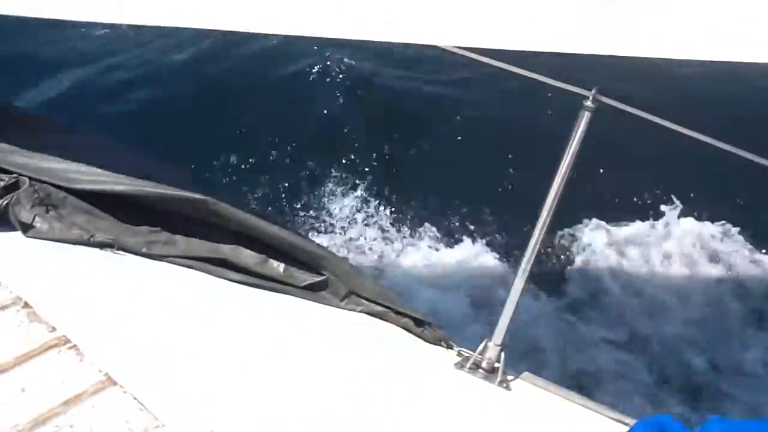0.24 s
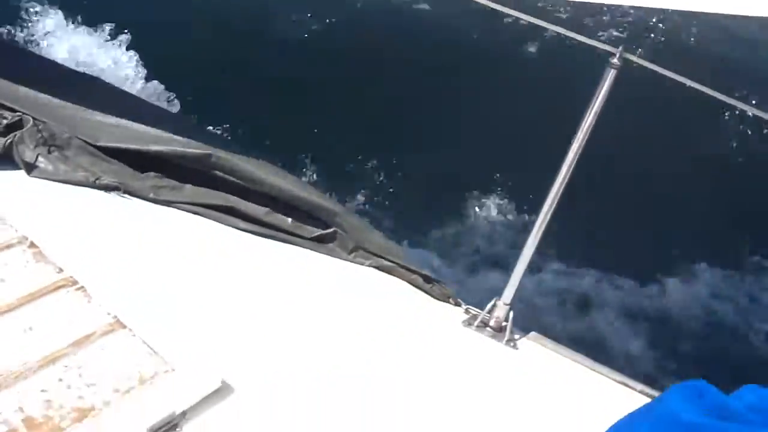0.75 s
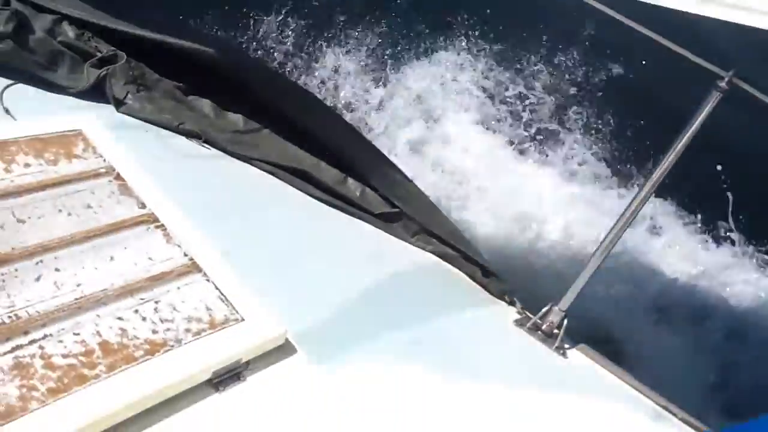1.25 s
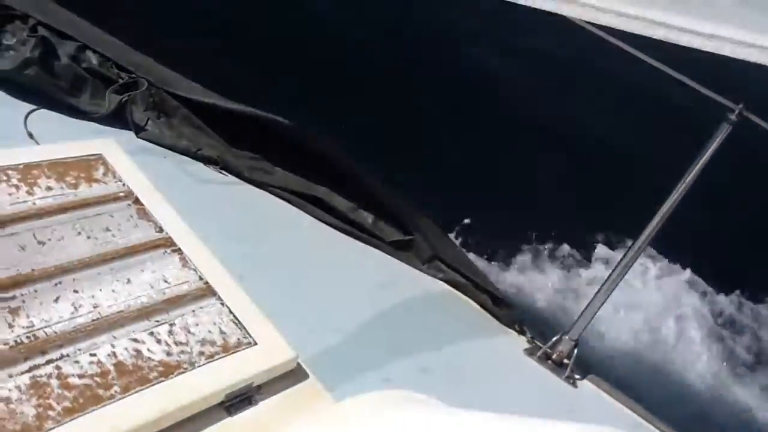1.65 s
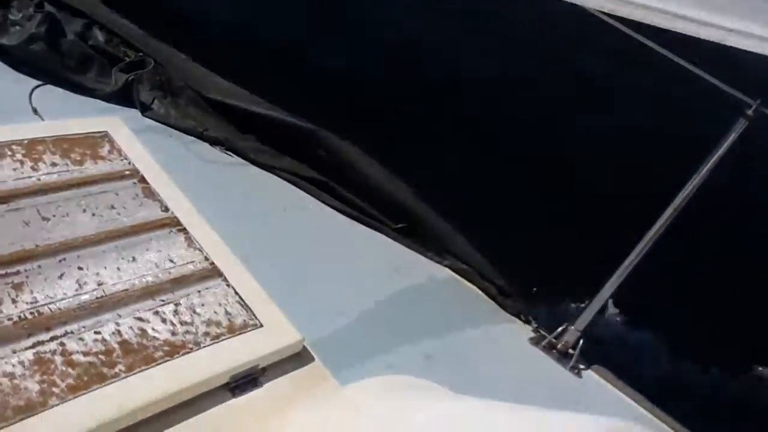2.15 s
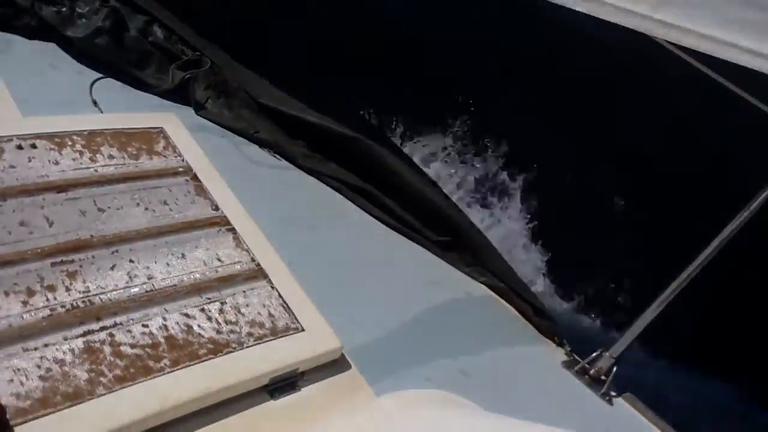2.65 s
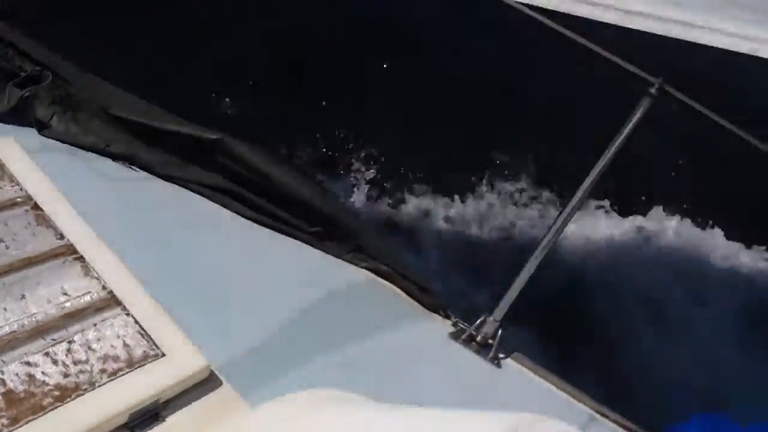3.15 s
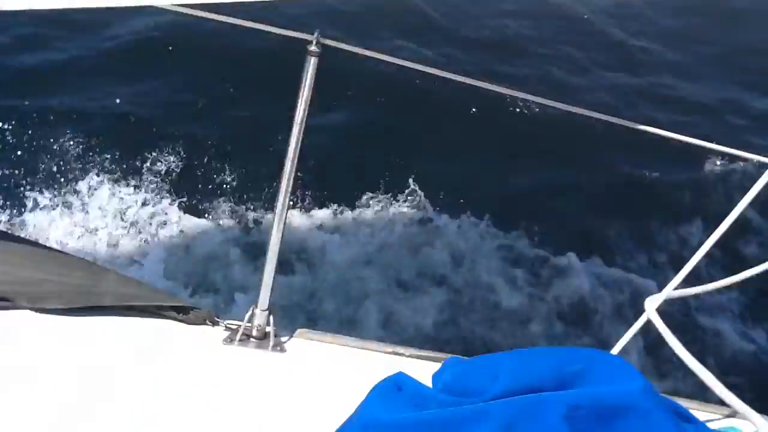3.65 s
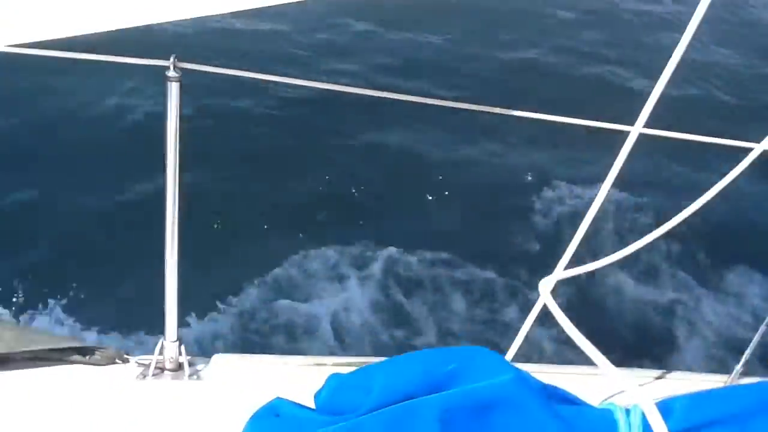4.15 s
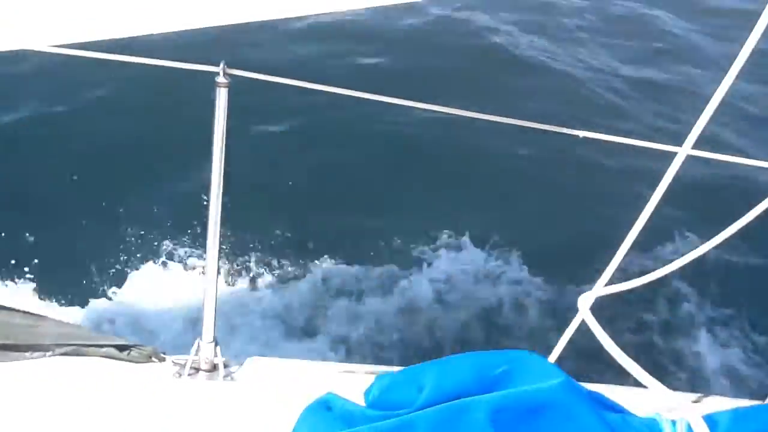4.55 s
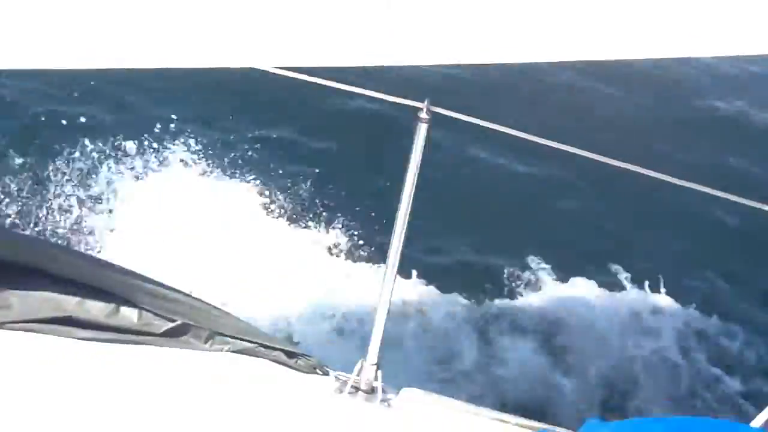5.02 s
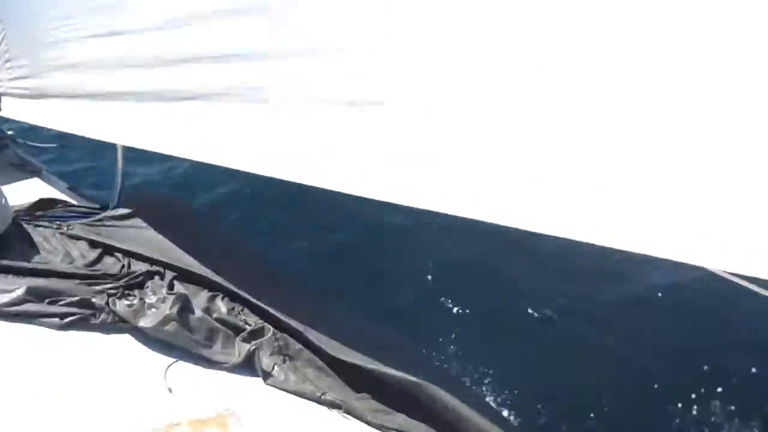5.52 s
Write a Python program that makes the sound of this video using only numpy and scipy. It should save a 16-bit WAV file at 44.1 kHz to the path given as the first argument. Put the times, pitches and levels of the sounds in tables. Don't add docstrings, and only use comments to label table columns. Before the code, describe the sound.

Wind buffets and crackles over a bare microphone on a sailing boat while spray hisses and foam washes along the hull.

```python
import sys
import numpy as np
from scipy import signal
from scipy.io import wavfile
from scipy.ndimage import uniform_filter1d

SR = 44100
rng = np.random.default_rng(int(sys.argv[2]) if len(sys.argv) > 2 else 0)


def materialize(psi):
    bounded = np.clip(np.atleast_2d(psi).T, -1, 1)
    quanta = np.round(bounded * 32767).astype(np.int16)
    wavfile.write(sys.argv[1], SR, quanta)


def volts(x):
    e = np.asarray(x, float) / 20
    return 10 ** e


N = 254898

# time_s, rumble_db, turbulence_db
WIND_LEVELS = [(0.0, -27, 3), (0.66, -28, -3), (1.22, -26.5, 2.5), (1.45, -30, 2), (1.69, -26, -1.5),
               (1.82, -25, 0), (2.09, -22, -1.5), (2.4, -29.5, -1.5), (2.88, -25.5, -1.5),
               (3.32, -25.5, -0.5), (3.73, -19.5, -2.5), (3.91, -26, 1), (4.3, -27.5, -11), (4.51, -30, 0),
               (4.8, -27, -2.5), (5.25, -27, 0), (5.65, -32, -8), (5.78, -32, 0)]
# centre_s, change_db, length_ms
AIR_PUFFS = [(.67, -5, 66), (.80, 4, 60), (1.13, 0, 60), (1.40, 5, 98), (1.51, -2, 140), (1.70, 3.5, 66),
             (1.824, -8, 36), (2.08, 0.5, 80), (2.335, -7, 30), (2.47, -2, 62), (2.62, 5.5, 82),
             (2.98, 5.5, 110), (3.15, -5.5, 92), (3.315, -5.5, 53), (3.69, 0, 45), (4.00, 3, 60),
             (4.07, 5, 44), (4.20, -3, 41), (4.38, 3, 37), (4.44, -3.5, 140), (4.83, 3, 45),
             (4.885, -12, 25), (5.02, 2.5, 46), (5.22, -7, 52), (5.33, 2, 88), (5.46, -3.5, 52),
             (5.54, 7.5, 51), (5.68, 3, 71)]
# peak_s, peak_db, rise_db_per_s, fall_db_per_s
BOW_SURGES = [(0.0, -48, 40, 45), (.35, -43.5, 35, 40), (1.07, -36, 50, 38), (1.17, -36, 40, 40),
              (1.26, -33.5, 40, 60), (1.31, -39, 60, 60), (1.52, -46, 30, 30), (1.7, -46.5, 25, 100),
              (2.1, -52.5, 40, 30), (2.48, -54, 90, 20), (2.64, -40.5, 48, 47), (2.95, -34, 44, 54),
              (3.33, -36.5, 69, 37), (3.59, -36, 51, 75), (3.73, -40, 64, 62), (3.88, -51, 40, 73),
              (4.4, -49, 30, 20), (4.59, -46, 22, 30), (4.97, -46, 60, 40), (5.07, -37, 60, 60),
              (5.14, -32.5, 80, 100), (5.175, -37, 60, 250), (5.3, -44.5, 30, 30), (5.56, -44.5, 60, 60)]
# pitch_hz, level_db (per Hz)
SPRAY_TONE = [(880, -33), (1500, 9), (1910, -2.5), (2600, -1.5), (2810, -6.5), (3970, -2.5), (7140, -1),
              (14400, -5.5)]
# pitch_hz, level_db (per Hz)
FOAM_TONE = [(300, -23), (700, 3), (1300, -1), (2200, -4.5), (3500, -9.5), (6000, -24.5)]
# centre_s, peak_db, width_ms
OUTWARD_SNAPS = [(0.063, -17, 0.87), (.258, -17, 0.63), (.3273, -21, 0.72), (0.3497, -18, .7),
                 (0.525, -15, 1.0), (0.5278, -16, 1.1), (.605, -8.5, 1.0), (.6077, -11, .75),
                 (0.8273, -19, .9), (.8859, -21.5, .6), (1.2537, -23, .8), (1.3085, -21, 0.91),
                 (1.5277, -16.5, 0.69), (1.7663, -17, .9), (2.0112, -16, 0.88), (2.1172, -13, .75),
                 (2.7795, -17, .9), (2.8346, -16, .7), (2.9959, -21, .5), (3.4619, -18, .3),
                 (3.715, -10, 1.2), (3.8304, -16, 0.46), (3.9322, -13, .5), (3.9334, -9.5, 0.27),
                 (3.9414, -10, 0.5), (4.0497, -18, .8), (4.1171, -11, 1.0), (4.1221, -14, 0.43),
                 (4.1303, -18, 0.78), (4.17, -18, 0.74), (4.2361, -23, .3), (4.2392, -16, 0.73),
                 (4.6709, -17, .7), (4.6741, -17, 0.69), (4.7039, -7, .2), (4.836, -24, .8),
                 (4.8383, -21, .9), (5.1074, -18, .9), (5.3191, -18, 0.65), (5.5068, -11, 1.3),
                 (.353, -24, .2), (.6105, -13, 1.2), (.6128, -12, 1.2), (3.8293, -24, .2),
                 (3.8327, -11, .3), (3.9312, -18, .25), (3.9362, -24, .2), (3.9369, -25, .2),
                 (3.9383, -10, .25), (3.9402, -23, .2), (3.9454, -20, .2), (4.1176, -13, .2),
                 (4.1236, -25, .2), (4.1693, -28, .2), (4.243, -27, .2), (4.254, -30, .25),
                 (4.5264, -26, .2), (4.7017, -21, .2), (4.705, -22, .2)]
# centre_s, peak_db, width_ms
INWARD_SNAPS = [(0.2475, -16, 0.68), (.2561, -24, 0.82), (.2816, -20, 1.2), (.3534, -17, 0.43),
                (.4442, -9, .7), (.5319, -24, .8), (.6067, -9, .9), (.6091, -5, .95), (.61151, -5, .5),
                (.6138, -3, .75), (1.0094, -17, .9), (1.1988, -18, .7), (1.2007, -19, .7),
                (1.2079, -10, 0.88), (1.3093, -21, 0.81), (1.429, -20, .9), (1.529, -20, .9),
                (1.8776, -17, 1.1), (1.9545, -23, .6), (2.012, -14, 1.0), (2.1664, -22, .8),
                (2.2909, -14, .75), (2.6384, -8, .9), (2.9255, -18, .7), (2.9271, -13, .8),
                (3.2485, -24, .8), (3.4636, -18, .9), (3.5205, -10, .7), (3.747, -12, 1.0),
                (3.8019, -10, 0.36), (3.8332, -3.5, 0.65), (3.8346, -2, 0.57), (3.9306, -3, 0.58),
                (3.9315, -7, .6), (3.9354, -3.5, 1.2), (3.9386, -12.5, 0.34), (3.9427, -11, 0.61),
                (3.9443, -10, 0.76), (3.9553, -7, 0.83), (3.9698, -17, 0.45), (4.1183, -5.5, .7),
                (4.167, -21, .8), (4.2372, -14.5, 0.45), (4.2446, -6.5, 0.62), (4.253, -17, 0.56),
                (4.256, -17, 0.46), (4.5124, -18, .6), (4.5242, -13, 0.61), (4.533, -12, .8),
                (4.5341, -17, 0.42), (4.6715, -16, 0.53), (4.7003, -8, 0.33), (4.703, -6.5, 0.51),
                (4.708, -13, 1.2), (4.94, -17, 0.59), (5.2434, -21, .6), (5.29, -17, .7), (5.3902, -17, .8),
                (5.5442, -12, .9)]
# centre_s, level_db, pitch_hz, length_ms
SPLASHES_AND_FOAM = [(.353, -46, 2000, 25), (1.205, -40, 5000, 25), (1.27, -50, 3000, 36),
                     (2.91, -37, 2300, 20), (2.98, -36, 2480, 36), (3.35, -45, 5200, 68),
                     (3.59, -51, 4000, 27), (3.86, -47, 5000, 10), (5.13, -34.5, 1500, 39),
                     (5.195, -40, 2600, 21), (1.55, -48, 1800, 180), (1.69, -44, 1900, 120),
                     (2.32, -49, 2200, 60), (2.49, -43, 1700, 110), (3.49, -43, 1800, 230),
                     (4.58, -53, 1500, 120), (5.40, -46.5, 1700, 140), (5.74, -46, 1600, 88),
                     (5.55, -47, 3000, 70), (.33, -45, 1600, 120), (4.53, -44.5, 1700, 33),
                     (.12, -55, 1400, 100), (.86, -48, 1500, 100), (3.12, -48, 1500, 100)]
# start_s, peak_db, flutter_hz, length_ms
BUFFETS = [(.243, -11, 202, 8.7), (.278, -11, 260, 4.9), (.36, -10.5, 197, 18), (.441, -24, 464, 14),
           (.522, -13.5, 295, 17), (.604, -22, 402, 9.3), (1.006, -18.5, 201, 9.9),
           (1.267, -17, 249, 18), (1.756, -8.5, 206.7, 21), (1.855, -9, 251, 20),
           (2.292, -12, 224, 4.4), (2.346, -14, 222, 12), (2.776, -15, 201, 10),
           (3.218, -8.5, 222, 5.3), (3.344, -15, 230, 20), (3.517, -14, 217, 9.5),
           (3.834, -3.5, 190, 13), (3.929, -5, 240, 9.7), (4.115, -10.5, 217, 12),
           (4.166, -12, 319, 10.6), (4.241, -9, 238, 13.4), (4.297, -15.5, 202, 8.9),
           (4.521, -19, 330, 17), (4.615, -17, 224, 13), (4.697, -7.5, 190, 11),
           (5.152, -13.5, 200, 10.7), (5.185, -16, 199, 11), (5.299, -6.5, 192, 13),
           (5.374, -11, 235, 15.4), (5.502, -6.5, 209, 22)]
# start_s, peak_db, flutter_hz, length_ms, roughness (0-1)
MORE_BUFFETS = [(1.197, -17, 314, 24, 0.6), (1.421, -10.5, 164, 25.5, 0.33), (2.299, -17, 184, 18.4, 0.6),
                (2.613, -8.5, 200, 16.3, 0.14), (2.6, -8.5, 238, 13, 0.26), (2.933, -9.5, 216, 24, 0.06),
                (2.953, -6.5, 276, 12.7, 0.22), (3.086, -11, 195, 11.7, 0), (3.747, -2.5, 178, 15, 0.02),
                (3.8, -7, 190, 8.8, 0.14), (3.939, -7.5, 200, 14, 0.5), (3.952, -8, 198, 16.5, 0.5),
                (4.05, -16.5, 215, 15, 0.46), (4.532, -13, 220, 12.4, 0.5), (4.718, -14, 210, 11, 0.3),
                (5.521, -8, 192, 45, 0.54), (3.711, -11, 207, 14, 0.1), (2.165, -12.5, 232, 12, 0.04),
                (1.954, -14, 234, 10, 0.17), (.962, -16, 230, 10.4, 0.4), (0.78, -13, 210, 8.3, 0.33),
                (5.5, -17, 234, 14, 0.6), (2.116, -15, 238, 12, .3), (3.14, -14, 190, 10, 0.16)]
# centre_s, level_db, side (-1 or 1), duck_db
OVERLOADS = [
    (0.613, -24, 1, 3.5),
    (3.931, -22, -1, 9.5),
    (4.116, -28, 1, 6),
    (4.167, -60, 1, .3),
    (4.70, -48, 1, 2),
]


def rms_one(x):
    return x / np.sqrt(np.mean(x ** 2) + 1e-20)


def steady(x):
    return x / np.sqrt(uniform_filter1d(x ** 2, size=5000) + 1e-20)


def in_time(rows):
    s, *columns = np.transpose(rows)
    return [np.interp(np.arange(N) / SR, s, c) for c in columns]


def butter(x, hz, kind, order):
    return signal.sosfilt(signal.butter(order, hz, kind, fs=SR, output="sos"), x)


def drift(rate_hz):
    r = np.exp(-40 * np.pi * rate_hz / SR)
    noise = rng.standard_normal(N // 20 + 2002)
    slow = signal.lfilter([1], [1, -2 * r, r * r], noise)[2000:]
    return np.interp(np.arange(N) / 20, np.arange(len(slow)), rms_one(slow))


def grains(per_s, spread_db):
    sizes = volts(spread_db * np.minimum(rng.exponential(1, N), 4))
    signs = rng.choice([-1, 1], N)
    return sizes * signs * (rng.random(N) < per_s / SR)


def banded(sources, spectrum, shared_db, patchy_db):
    out = 0
    edges = 280 * 2 ** np.arange(0, 6.1, .5)
    hz, level_db = np.transpose(spectrum)
    for k, (low, high) in enumerate(zip(edges, edges[1:])):
        tone_db = np.interp(np.log(low * high) / 2, np.log(hz), level_db)
        gain_db = tone_db + shared_db + patchy_db * drift(10.7)
        out = out + volts(gain_db) * butter(sources[k % 2], [low, high], "band", order=2)
    return rms_one(out)


def port(x):
    return butter(x, 140.8, "high", order=4)


def airflow():
    t = np.arange(0, N, 32) / SR
    puffs_db = sum(change_db * np.exp(-((t - s) / (ms / 2000)) ** 2) for s, change_db, ms in AIR_PUFFS)
    rumble_db, fine_db = in_time(WIND_LEVELS)
    return rumble_db + np.interp(np.arange(N) / SR, t, puffs_db), fine_db


def wind(rumble_db, fine_db):
    small_eddy_db, follows = -36.5, 1.44
    small_db = small_eddy_db + fine_db + follows * (rumble_db - rumble_db.mean())
    lumps_db = 1.37 * drift(25.0) + 1.37 * drift(35)
    large = port(butter(grains(900, spread_db=2.5), 171.0, "low", order=2))
    small = butter(grains(900, spread_db=2.0), 254, "high", order=2)
    small = butter(small, 618, "low", order=4)
    large = volts(rumble_db + 1.55) * steady(volts(lumps_db) * large)
    small = volts(small_db) * steady(volts(1.2 * lumps_db) * small)
    return butter(large + small, 1500, "low", order=3)


def bow_wave():
    wash_db = -51
    foam_db, follows, lingers_s = -42, 0.56, 0.041
    t = np.arange(0, N + 32, 32) / SR
    power = volts(2 * wash_db)
    for s, peak_db, rise, fall in BOW_SURGES:
        below_peak_db = np.where(t < s, rise * (s - t), fall * (t - s))
        power = power + volts(2 * (peak_db - below_peak_db))
    r = np.exp(-t[1] / lingers_s)
    lingering = signal.lfilter([1 - r], [1, -r], power, zi=[power[0]])[0]
    lingering_db = 10 * np.log10(lingering)
    foam_curve_db = foam_db + follows * (lingering_db - lingering_db.mean())
    return in_time(np.transpose([t, 10 * np.log10(power), foam_curve_db]))


def spray(level_db):
    drops = [grains(16000, spread_db=4.0) for _ in range(2)]
    return volts(level_db + 0.54) * banded(drops, SPRAY_TONE, shared_db=0.65 * drift(37), patchy_db=1.13)


def foam(level_db):
    pops = [grains(2200, spread_db=1.5) for _ in range(2)]
    return volts(level_db) * banded(pops, FOAM_TONE, shared_db=1.44 * drift(19), patchy_db=0.5)


def stray_snaps(rumble_db, count=40):
    over_rumble_db, spread_db, width_ms = 2, 8, 0.47
    when, size, width = rng.random((count, 3)).T
    s = .02 + when * (N / SR - .04)
    peak_db = rumble_db[(s * SR).astype(int)] + over_rumble_db + spread_db * np.log(size + .02)
    return list(zip(s, peak_db, width_ms * (0.98 + width)))


def snaps(rumble_db):
    rebound_hz, pointed = 169, 1.57
    out = np.zeros(N + 512)
    t_ms = np.arange(-256, 256) / SR * 1000
    strays = stray_snaps(rumble_db)
    stray_sides = rng.choice([-1, 1], len(strays))
    sides = np.r_[-np.ones(len(INWARD_SNAPS)), np.ones(len(OUTWARD_SNAPS)), stray_sides]
    for (s, peak_db, ms), side in zip(INWARD_SNAPS + OUTWARD_SNAPS + strays, sides):
        at = round(s * SR) - 256
        spike = .5 ** (np.abs(2 * t_ms / max(ms, .1)) ** pointed)
        out[at:at + len(t_ms)] += side * volts(peak_db + 3.5) * spike
    sprung = butter(out[:N] + 1e-18, rebound_hz, "high", order=2)
    return butter(sprung + 1e-18, 4400, "low", order=10)


def splashes():
    out, t = np.zeros(N), np.arange(N) / SR
    fizz = grains(5000, spread_db=4.5)
    for s, level_db, hz, ms in SPLASHES_AND_FOAM:
        near = slice(max(round((s - .3) * SR), 0), round((s + .3) * SR))
        band = rms_one(butter(fizz[near], [hz / 1.56, hz * 1.3], "band", order=2))
        out[near] += volts(level_db) * band * np.exp(-((t[near] - s) / (ms / 2000)) ** 2)
    return out


def buffets():
    out, t = np.zeros(N + 4096), np.arange(4096) / SR
    table = [(*row, 0.33) for row in BUFFETS] + MORE_BUFFETS
    noise = rng.standard_normal((len(table), 3, len(t)))
    for (s, peak_db, hz, ms, rough), (wobble, dull, bright) in zip(table, noise):
        swell = np.sin(np.pi * np.minimum(t / (max(ms, 3) / 1000), 1) ** 0.8) ** 0.6
        wander = rms_one(butter(wobble, 237, "low", order=2))
        turns = np.cumsum(hz * (1 + 0.24 * wander)) / SR
        flutter = np.sin(2 * np.pi * turns) + 0.16 * np.cos(4 * np.pi * turns)
        share = np.clip(rough, 0, 1)
        turbulence = rms_one(butter(dull, 2.16 * hz, "low", order=4))
        body = port(swell * ((1 - share) * flutter + share * turbulence))
        crunch = swell * rms_one(butter(bright, [700, 2300], "band", order=3))
        body = body + share * volts(peak_db - 16.5) * crunch
        at = max(round((s - .0025) * SR), 0)
        out[at:at + len(t)] += volts(peak_db - 2.5) * body / np.abs(body).max()
    return out[:N]


def thumps():
    t = np.arange(N) / SR
    out = np.zeros(N)
    for s, level_db, side, _ in OVERLOADS:
        out += np.sign(side) * volts(level_db + 0.5) * np.exp(-((t - s) / 0.0018) ** 2)
    return out


def ducking():
    recover_s = 0.3
    t = np.arange(N) / SR
    drop_db = np.zeros(N)
    for s, _, _, duck_db in OVERLOADS:
        drop_db += duck_db * (t > s + .008) * np.exp(-np.maximum(t - s, 0) / recover_s)
    return volts(-drop_db)


def scene():
    rumble_db, fine_db = airflow()
    spray_db, foam_db = bow_wave()
    gain = ducking()
    air = gain * wind(rumble_db, fine_db) + snaps(rumble_db) + buffets()
    air = butter(.8 * np.tanh(air / .8), 58, "high", order=2)
    water = gain * (spray(spray_db) + foam(foam_db)) + splashes()
    return (air + water + thumps())[None]


def band_limit(x):
    return signal.sosfilt(signal.butter(12, 15880, fs=SR, output="sos"), x)


def record(dry):
    ceiling = 1
    x = dry / (1 + (dry / ceiling) ** 6) ** (1 / 6)
    x = x + volts(-72) * butter(rng.standard_normal(dry.shape), 60, "low", order=1)
    x = signal.sosfilt(signal.ellip(16, .2, 95, 15280, fs=SR, output="sos"), x)
    return band_limit(x)


dry = scene()
out = record(dry)
materialize(out)
```